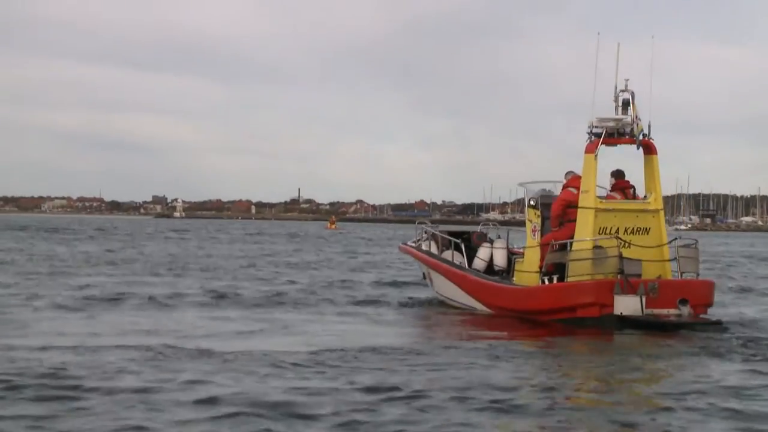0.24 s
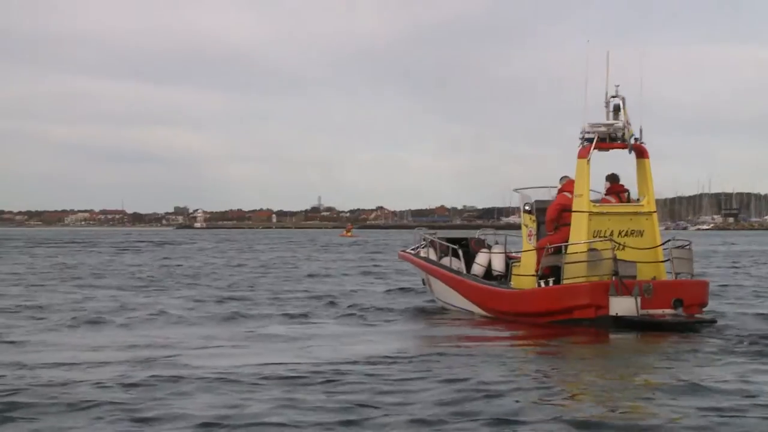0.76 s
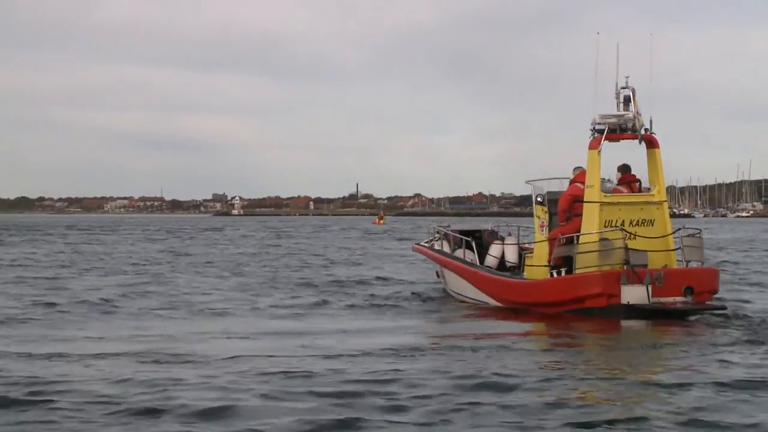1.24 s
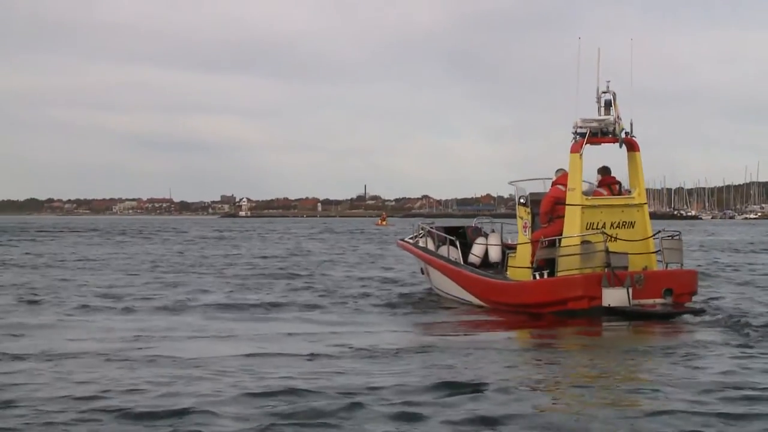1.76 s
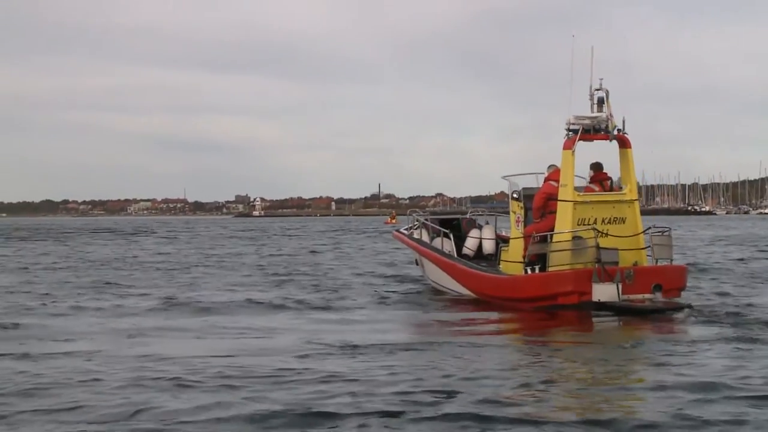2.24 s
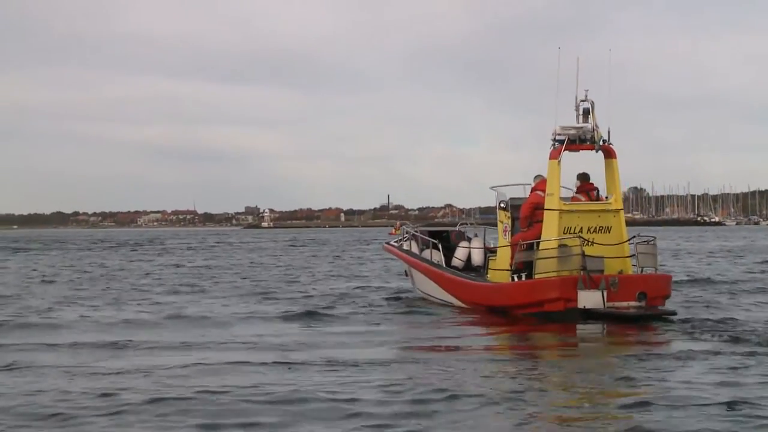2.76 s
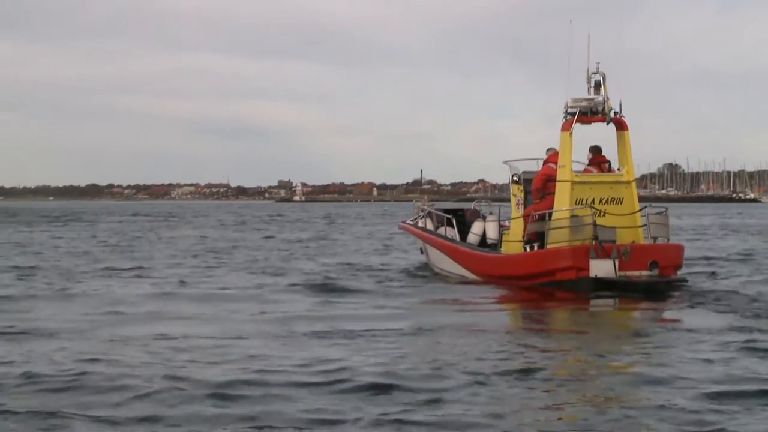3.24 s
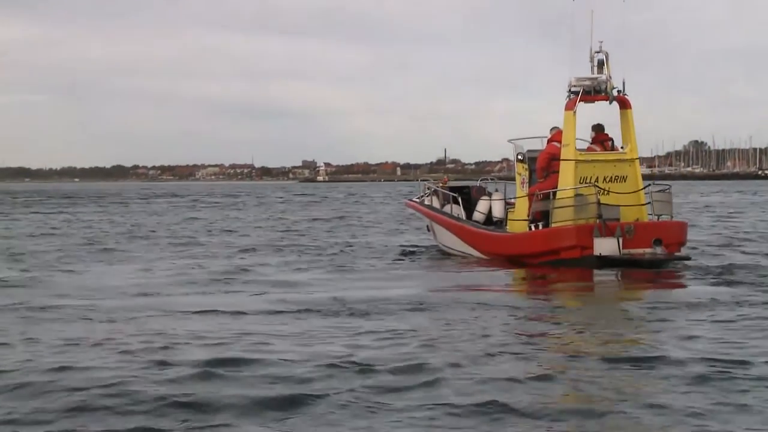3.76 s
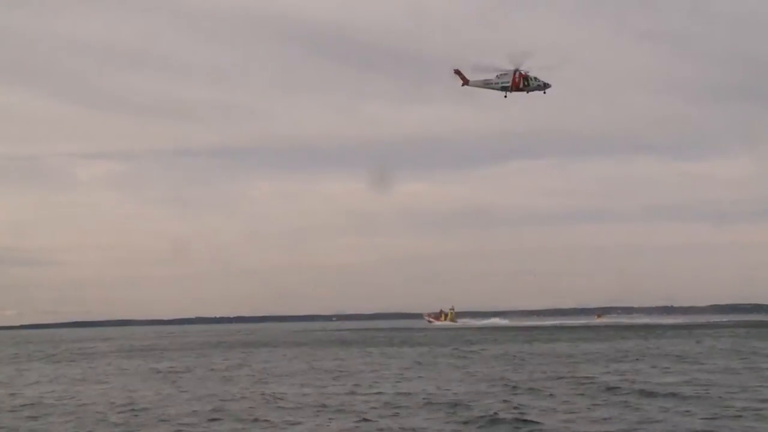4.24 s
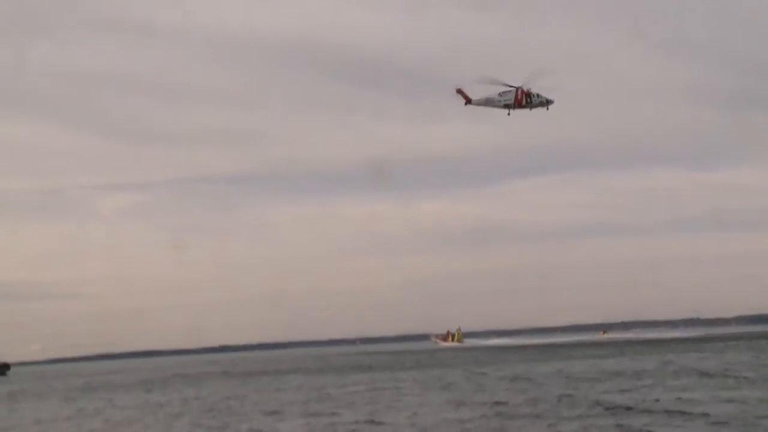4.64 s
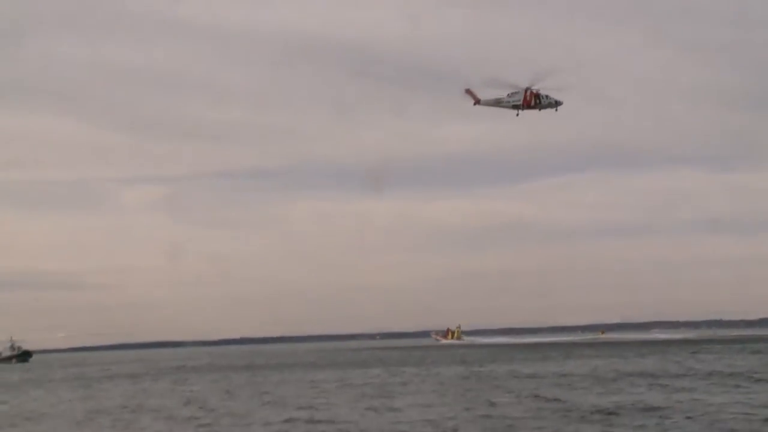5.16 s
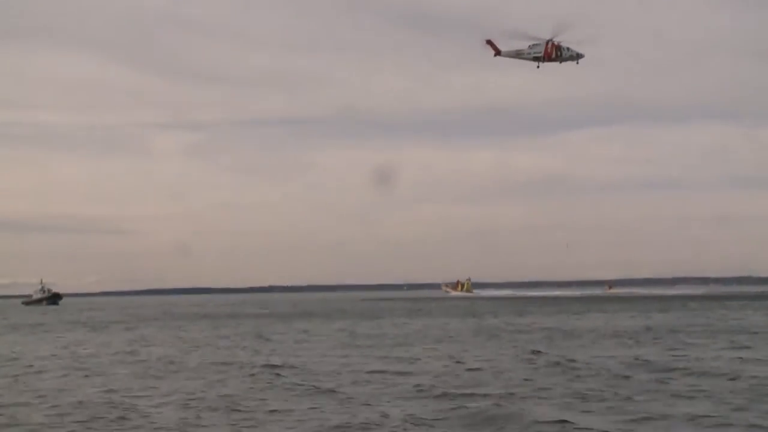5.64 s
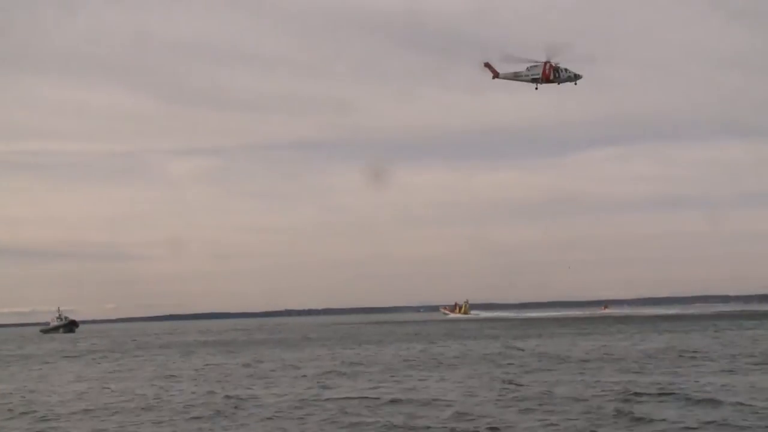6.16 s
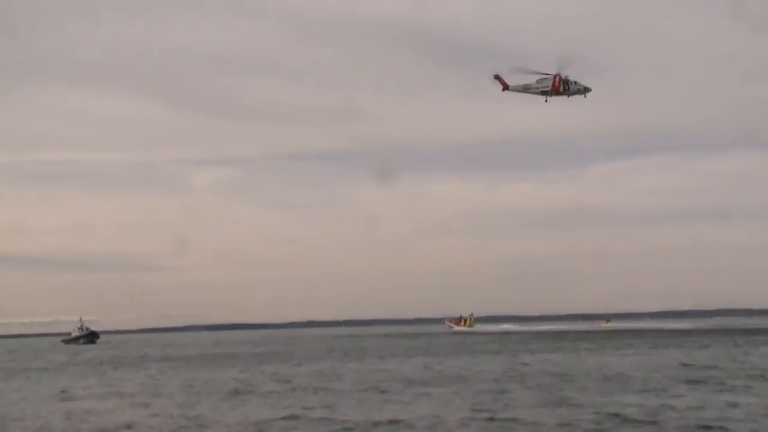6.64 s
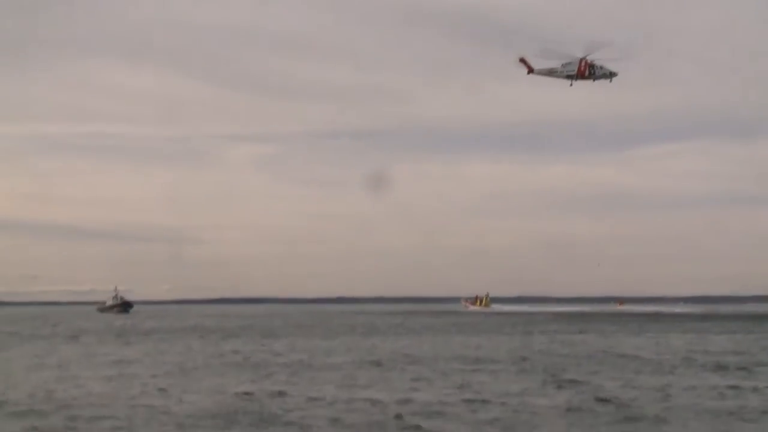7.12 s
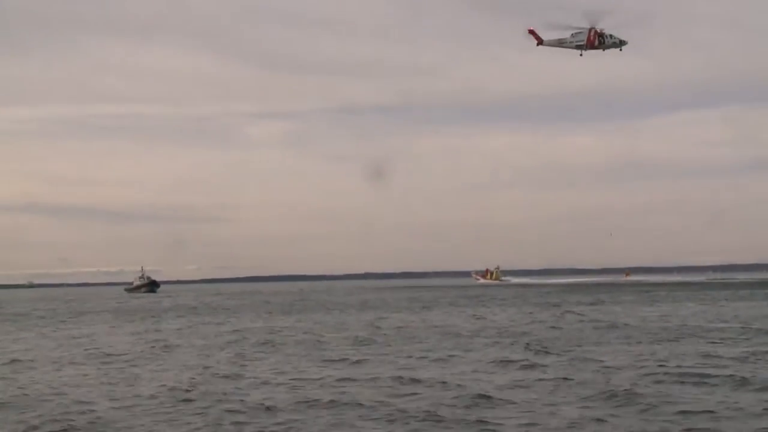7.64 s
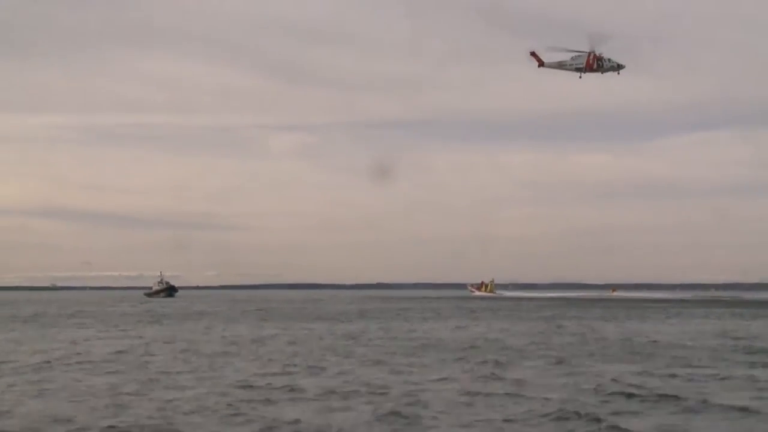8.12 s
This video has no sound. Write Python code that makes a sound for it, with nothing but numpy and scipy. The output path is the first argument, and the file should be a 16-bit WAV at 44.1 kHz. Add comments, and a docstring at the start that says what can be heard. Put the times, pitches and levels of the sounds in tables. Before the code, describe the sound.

Rapid rotor thudding, about twenty-one beats a second, over engine roar and low hum, then a deeper, hissier, windier version of the same helicopter.

```python
"""A helicopter over open water, heard at two places. At the first, each main-rotor blade radiates a thump near
250 Hz and a burst of rough air, over a tail-rotor hum and a roar of turbines and downwash; some blades crack.
From 3.6 s this fades, with a faint passing tone, into a second place with deeper thumps near 120 Hz and rarer cracks.
There washes of hiss, veils of spray, drops and gusts on the microphone pass, and a ripple rides on some thumps."""
import sys
import numpy as np
from scipy import signal
from scipy.fft import rfft, irfft, next_fast_len
from scipy.io import wavfile

SR = 44100
rng = np.random.default_rng(int(sys.argv[2]) if len(sys.argv) > 2 else 0)


def inscribe(sig):
    """Save sig as 16-bit PCM at rate SR to the path in sys.argv[1].

    A 1-D sig is mono; a 2-D sig holds one channel per row.
    Samples are clipped to [-1, 1] before scaling.
    """
    pcm = np.round(np.clip(np.atleast_2d(sig).T, -1, 1) * 32767)
    wavfile.write(sys.argv[1], SR, pcm.astype(np.int16))


N = 369999
TIME = np.arange(N) / SR   # s

# "Spread" is the standard deviation of a bell-shaped envelope.
# Arrival of the blades behind a steady clock. Each row: time in seconds, thump lag in ms, swish lag in ms,
# unrest of the thump's phase in radians.
FIRST_PATH = [(0, 12.2, 16.8, 1.7), (.7, 8.55, 8.4, 1.3), (1.4, 6.95, 8.9, 1.5), (2.1, 9.3, 6.8, 1.5),
              (2.8, 5.6, 7.1, 0.43), (3.5, 9.1, 10.2, 2.3), (4.2, 6.8, 5.6, 1.6)]
SECOND_PATH = [(3.9, 30.8, 26.1, 0.074), (4.6, 34.4, 29, 0.17), (6, 38.05, 34.4, 0.28),
               (6.7, 42.3, 37.3, 0.9), (8.39, 46.73, 40.9, 1.0)]
# Blade sound swelling and sinking, its pitch wandering. Each row: time in seconds, thump pitch in Hz, thump
# level in dB, dull swish level in dB, bright swish level in dB.
FIRST_BLADES = [(0.0, 265, -39, -48, -51.5), (0.15, 269, -34.5, -42.5, -47.5),
                (0.36, 300, -42.5, -50, -51.5), (0.58, 238, -32, -46.5, -52), (0.84, 228, -38, -46, -52),
                (1.2, 256, -38.5, -44, -49.5), (1.42, 216, -34.5, -52, -50.5),
                (1.6, 291, -33.5, -50.5, -49.5), (1.8, 253, -37, -44.5, -48.5),
                (2.24, 251, -41.5, -50.5, -52.5), (2.4, 244, -36.5, -48.5, -45.5),
                (2.74, 241, -36.5, -50, -52.5), (2.88, 260, -49, -49.5, -46.5), (3.0, 271, -36, -48, -48.5),
                (3.13, 262, -49.5, -49.5, -48), (3.421, 265, -36.5, -46.5, -46.5),
                (3.6, 235, -46, -46.5, -52.5), (3.84, 268, -37, -50.5, -53), (4.2, 245, -55, -52, -48)]
SECOND_BLADES = [(4.1, 122, -34.5, -43, -51.5), (4.4, 124, -35.5, -39.5, -44), (4.8, 123, -32, -40, -47.5),
                 (5.22, 117, -34, -42, -52), (5.55, 118, -35, -46.5, -51.5), (5.92, 128, -26, -43.5, -52),
                 (6.2, 120, -32, -42, -47.5), (6.36, 121, -36.5, -50, -54), (6.6, 124, -33.5, -41.5, -52.5),
                 (6.9, 120, -42, -46, -49), (7.181, 114, -31.5, -42.5, -43.5),
                 (7.46, 122, -31.5, -43, -45.5), (7.78, 119, -33.5, -47, -50), (8.12, 111, -29, -39.5, -41),
                 (8.39, 119, -39, -44.5, -46)]
# The crossfade between the places: start in seconds, end in seconds.
FADE_SPAN_S = (3.605, 4.45)
# Slower pressure swings of each blade. Each row: pitch in Hz, spread in ms, peak in dB at median thump level
# and no unrest, lag in ms, share of the thump's swelling and unrest (0-1).
FIRST_SWINGS = [(121, 4.56, -35.5, 0, 0.12), (34, 12.3, -49, 0, 0.02)]
SECOND_SWINGS = [(209, 5.7, -32, -1.55, 0.28), (83.8, 14.7, -38, 1, 1), (21.9, 27, -49.5, -0.29, .1)]
# Relative spectra of the noise in the swishes and the roar. Each row: frequency in Hz, level in dB per Hz.
FIRST_SWISH_SPECTRUM = [(240, -3), (400, 5.5), (478, -12), (793, 2), (1080, 1.5), (1400, -15), (1740, -1.5),
                        (1960, -15), (2250, 3), (3360, -17), (4200, -13), (8440, -41.5), (14000, -76)]
SECOND_SWISH_SPECTRUM = [(180, -36.5), (280, -2.5), (360, 3.5), (480, 15), (640, 7.5), (850, 3),
                         (1180, -10), (1550, -4.5), (1970, -10), (2280, 1.5), (3140, -12), (4400, -15.5),
                         (9070, -54), (14000, -70)]
FIRST_ROAR_SPECTRUM = [(15, -47), (25, -16), (110, -7), (260, -4.5), (360, -13), (470, -18.5), (640, -24.5),
                       (1020, -25), (1340, -28), (1950, -29.5), (2230, -21), (3090, -33), (4260, -32.5),
                       (15500, -81.5)]
SECOND_ROAR_SPECTRUM = [(20, -19.5), (113, -7), (227, -10), (359, -19), (552, -22.5), (1140, -26),
                        (1950, -27), (2200, -20), (2520, -22), (2900, -27.5), (4500, -33), (5100, -41),
                        (6700, -48.5), (9300, -70.5), (15500, -83.5)]
# Engines and downwash. Each row: time in seconds, roar level from 1.5 to 6 kHz in dB.
FIRST_LOAD = [(0, -55), (.4, -58), (1.3, -54.5), (1.9, -57), (3.3, -59.5), (3.8, -61.5), (4.2, -42)]
SECOND_LOAD = [(4.1, -49), (4.36, -43.5), (4.6, -45.5), (6.3, -45.5), (6.48, -41), (6.85, -45), (7.2, -42),
               (8.39, -43.5)]
# Tail rotor. Each row: time in seconds, level of the fundamental in dB.
TAIL_LEVEL = [(0.0, -41.5), (0.6, -46.5), (1.2, -42), (2.1, -46), (3.6, -44), (3.9, -46), (4.8, -40.5),
              (5.1, -39.5), (5.7, -38), (6.3, -32.5), (6.6, -39.5), (7.15, -33), (7.5, -38), (7.8, -33.5),
              (8.1, -44), (8.4, -40)]
# Blade tips cracking through the wake. Each row: time in seconds, shock drive in dB, treble in dB relative to it.
CRACKS = [(0.2054, -17.5, -32), (0.2533, -21, -26), (0.4893, -9, -44), (1.2052, -13, -42),
          (1.6801, -24, -43), (1.729, -2, -36), (1.8258, -15, -42), (1.8731, -14.5, -40),
          (2.1135, -19, -41), (2.3979, -16, -30), (2.4448, -28, -29), (2.7317, -10, -49),
          (2.8775, -19, -36), (2.9253, -19, -40), (3.259, -15, -40), (3.4047, -11, -31), (3.4526, -15, -34),
          (3.4999, -7.5, -23), (3.5473, -5, -23), (4.717, -20, -45), (7.3577, -11, -46), (7.4051, -26, -39),
          (7.5004, -13, -39), (8.1244, -28, -41)]
# Resonances of the microphone. Each row: frequency in Hz, width in Hz, gain in dB.
MIC_RESONANCES = [(2190, 380, 3.5), (1050, 210, -5), (3800, 600, -9.5)]
# Single drops. Each row: start in seconds, initial level in dB.
DROPS = [(2.5238, -60), (2.5765, -60), (4.3174, -67), (4.5344, -63), (7.3048, -69), (7.747, -75),
         (7.761, -57), (8.028, -66)]
# Veils of spray. Each row: centre in seconds, peak in dB before flicker and fade-in, spread in seconds.
SPRAY = [(4.4, -81, .07), (5.05, -84, .03), (5.2, -80, .035), (6.0, -78, .03), (7.55, -73, .06),
         (7.66, -63, 0.045), (7.78, -74, .06)]
# Brighter surges of downwash on the water. Each row: centre in seconds, peak in dB before the crossfade,
# spread in seconds.
WASH = [(4.0, -50, 0.069), (4.45, -48.5, 0.28), (5.7, -62.5, 0.15), (6.55, -48.5, 0.23), (7.1, -49, .2),
        (8.1, -54, 0.5)]
# Treble hiss of the downwash. Each row: time in seconds, level in dB before the crossfade.
SHEEN = [(3.7, -55.5), (4.05, -52), (4.4, -52.5), (5.0, -60), (5.75, -57.5), (6.15, -65), (6.5, -53.5),
         (7.1, -56.5), (7.4, -61.5), (8.39, -60)]
# Spells of ripple on the second place's thumps. Each row: centre in seconds, peak in dB before the crossfade,
# spread in seconds.
RIPPLE = [(6.35, -42, 0.082), (7.38, -39, 0.19), (8.05, -36.5, 0.21)]
# Wind on the microphone. Each row: centre in seconds, peak in dB, spread in seconds.
GUSTS = [(1.3, -48, 0.18), (3.28, -53, .1), (5.2, -55.5, 0.18), (6.4, -41, .25), (6.9, -39.5, .15),
         (7.45, -47, 0.19), (8.2, -39, 0.35)]
# A faint passing tone. Each row: centre in seconds, peak in dB, spread in seconds.
WHISTLE = [(3.64, -64, 0.13)]

BLADE_HZ = 20.9   # blade passages per second
TAIL_HZ, TAIL_WAVER_HZ = 114.75, 0.4
RIPPLE_HZ, WHISTLE_HZ = 295.5, 1400
# levels between surges
BREEZE_DB, MIST_DB, WASH_REST_DB, RIPPLE_REST_DB = -61.5, -97.5, -79, -53.5
AIR_DB = -96.5   # steady faint hiss of the microphone
CUTOFF_HZ = 16300


def from_db(db):
    """Amplitude is ten to the power of the level over twenty."""
    return 10 ** (np.asarray(db) / 20)


def rms_one(x):
    """Division by the root mean square gives unit power."""
    return x / np.sqrt(np.mean(x ** 2) + 1e-20)


def in_time(rows):
    """Linear interpolation turns each column of a timed table into a signal."""
    s, *columns = np.transpose(rows)
    return [np.interp(TIME, s, c) for c in columns]


def at_hz(points, hz):
    """A spectrum is interpolated linearly in dB over logarithmic frequency."""
    point_hz, point_db = np.transpose(points)
    return np.interp(np.log(hz), np.log(point_hz), point_db)


def drift(rate_hz):
    """Slow chance: noise at every 40th sample, twice low-passed, has unit spread and varies smoothly."""
    r = np.exp(-80 * np.pi * rate_hz / SR)
    noise = rng.standard_normal(N // 40 + 2002)
    slow = signal.lfilter([1], [1, -2 * r, r * r], noise)[2000:]   # settled part
    return np.interp(np.arange(N) / 40, np.arange(len(slow)), rms_one(slow))


def band(x, low_hz, high_hz):
    """A band-pass filter transmits the range between two frequencies."""
    return signal.sosfilt(signal.butter(2, [low_hz, high_hz], "band", fs=SR, output="sos"), x)


def noise_bands(spectrum):
    """Shaped noise is the sum of 12 overlapping bands, spaced two thirds of an octave from 60 Hz up."""
    size = next_fast_len(N, True)
    hz = np.maximum(np.arange(size // 2 + 1) * SR / size, 1)
    shaped = rfft(rng.standard_normal(size)) * from_db(at_hz(spectrum, hz))
    place = np.clip(1.5 * np.log2(hz / 60), 0, 11)
    return np.array([irfft(shaped * np.maximum(1 - np.abs(place - k), 0), size)[:N] for k in range(12)])


def surges(rows, rest_db):
    """A gain rests at one level and swells in a bell around each event."""
    gain = from_db(rest_db)
    for s, db, spread_s in rows:
        gain = gain + from_db(db) * np.exp(-.5 * ((TIME - s) / spread_s) ** 2)
    return gain


def wind():
    """Turbulence at the microphone is heard as lumpy low-frequency noise."""
    lumps = band(rng.standard_normal(N), 24, 60) * from_db(1.5 * drift(3.2))
    return surges(GUSTS, BREEZE_DB) * rms_one(lumps)


def water():
    """Fine spray is treble noise under a bell and a drop is its sudden decay, over the microphone's hiss."""
    fade_in = np.clip(TIME - FADE_SPAN_S[0], 0, 1)   # over one second
    gain = surges(SPRAY, MIST_DB) * from_db(1.5 * drift(30)) * fade_in
    gain += from_db(AIR_DB)
    for s, db in DROPS:
        gain += from_db(db) * (TIME > s) * np.exp(-np.maximum(TIME - s, 0) / 0.0019)
    return gain * rms_one(band(rng.standard_normal(N), 7000, 22000))


def whistle():
    """A pure sinusoid of constant pitch swells and fades under a bell."""
    return surges(WHISTLE, -140) * np.sqrt(2) * np.sin(2 * np.pi * WHISTLE_HZ * TIME)


def wash():
    """Downwash striking water gives a flickering band of hiss and a separate sheen of higher noise."""
    hiss = band(band(rng.standard_normal(N), 2400, 3050), 2250, 3060)
    hiss = rms_one(hiss) * from_db(2.6 * drift(13))
    sheen = band(band(rng.standard_normal(N), 3200, 4750), 3200, 4750)
    sheen = rms_one(sheen) * from_db(1.7 * drift(9.9))
    return surges(WASH, WASH_REST_DB) * hiss + from_db(in_time(SHEEN)[0]) * sheen


def roar(spectrum, patchy_db, tint_db):
    """Turbines, downwash and water make noise whose bands flicker partly together and whose colour wanders."""
    together = drift(29)
    out = np.zeros(N)
    for part in noise_bands(spectrum):
        flicker_db = patchy_db * (0.72 * together + drift(6.6))
        out += part * from_db(flicker_db + tint_db * drift(0.57))
    return out / np.std(band(out, 1500, 6000))


def tail_rotor():
    """Periodic blade loading gives a hum of wavering pitch with a weak octave."""
    hz = TAIL_HZ + TAIL_WAVER_HZ * drift(1.5)
    phase = 2 * np.pi * np.cumsum(hz) / SR
    hum = np.sin(phase) + from_db(-18.0) * np.sin(2 * phase)
    return np.sqrt(2) * from_db(in_time(TAIL_LEVEL)[0]) * hum


def cracks():
    """A steep shock and weak followers excite the microphone's resonances; a treble impulse is added to each."""
    body, treble, fall = np.zeros(N), np.zeros(N), np.arange(200)
    for s, db, treble_db in CRACKS:
        at = round(s * SR)
        followers = 0.31 * rng.standard_normal(200) * np.exp(-fall / 70)
        shock = -0.87 * (fall < 2)
        body[at:at + 200] += from_db(db) * (followers + shock)
        treble[at] = -from_db(db + treble_db)
    ringing = np.zeros(N)
    for hz, width_hz, db in MIC_RESONANCES:
        r = np.exp(-np.pi * width_hz / SR)
        poles = [1, -2 * r * np.cos(2 * np.pi * hz / SR), r * r]
        ringing += from_db(db) * signal.lfilter([1 - r, 0, r - 1], poles, body)
    air_loss = signal.butter(4, 6000, fs=SR, output="sos")   # air absorbs the top
    return signal.sosfilt(air_loss, ringing + 1e-18) + band(treble + 1e-18, 4000, 15000)


def blades(lag_ms):
    """Retarded time: a delayed blade clock gives the nearest passage and the time from it in ms."""
    turns = (TIME - lag_ms / 1000) * BLADE_HZ
    count = np.round(turns)
    return count.astype(int) + 1, 1000 * (turns - count) / BLADE_HZ


def ripple():
    """Wake vortices struck by the blades add a few quicker swings to each thump."""
    early_lag = in_time(SECOND_PATH)[0] - 2.5   # ms
    swings = thumps(early_lag, np.full(N, RIPPLE_HZ), 0, 1.66, 1.78, [], uneven_db=4.5)
    return surges(RIPPLE, RIPPLE_REST_DB) * swings


def swishes(lag_ms, spectrum, spread_ms, slide_ms, echo_db, dull_db, bright_db, uneven_db, colour_db, jitter_ms):
    """Each blade sheds a short burst of turbulent noise, with a strength, colour and moment of its own."""
    count, ms = blades(lag_ms)
    chance = rng.standard_normal((200, 14))   # per blade: moment, strength, then 12 band levels
    off = (ms - jitter_ms * chance[count, 0]) / spread_ms
    core = np.exp(-.5 * off ** 2)
    skirts = 0.27 * np.exp(-.5 * (off / 2.88) ** 2)
    bursts = (core + skirts) * noise_bands(spectrum)
    for k, part in enumerate(bursts):
        # blades shed alike amounts of sound before their own strength and colour act
        energy = np.bincount(count, part ** 2, 200) + 1e-20
        even = np.minimum(np.sqrt(np.median(energy[energy > 1e-20]) / energy), 4)
        own = from_db(uneven_db * chance[:, 1] + colour_db * chance[:, 2 + k])
        part = part * (even * own)[count]
        bursts[k] = np.roll(part, round(max(6 - k, 0) * slide_ms * SR / 1000))   # lows come later
    dull = bursts[:7].sum(axis=0)
    bright = bursts[7:].sum(axis=0)
    dull = dull + from_db(echo_db) * np.roll(dull, round(.012 * SR))   # bounce off the water
    return from_db(dull_db) * rms_one(dull) + from_db(bright_db) * rms_one(bright)


def thumps(lag_ms, hz, thump_db, unrest, spread_ms, swings, uneven_db):
    """A suction dip between two pushes; unsteady air shifts the wave in its hull and weakens the slow swings."""
    count, ms = blades(lag_ms)
    centre = np.clip(np.arange(N) - (ms * SR / 1000).astype(int), 0, N - 1)   # sample of the passage
    slip = (unrest * (drift(1.2) + 0.37 * drift(5.5)))[centre]
    pulse = np.exp(-.5 * (ms / spread_ms) ** 2) * np.cos(2 * np.pi * hz[centre] * ms / 1000 + slip)
    strength = from_db(uneven_db * rng.standard_normal(200))   # one per blade
    out = from_db(thump_db) * rms_one(pulse * strength[count])
    for swing_hz, swing_ms, db, late_ms, share in swings:
        since = ms - late_ms
        wave = np.exp(-.5 * (since / swing_ms) ** 2) * np.cos(2 * np.pi * swing_hz * since / 1000)
        change_db = share * (thump_db - np.median(thump_db) - 4.4 * unrest)
        out += from_db(db + change_db) * wave
    return -out


def helicopter(path, heard, load, swings, swish, steady, thump_ms, swish_ms, slide_ms, echo_db, colour_db):
    """Superposition: thumps, swishes and roar of the main rotor and engines add at one listening place."""
    thump_lag, swish_lag, unrest = in_time(path)
    hz, thump_db, dull_db, bright_db = in_time(heard)
    low = thumps(thump_lag, hz, thump_db, unrest, thump_ms, swings, uneven_db=1.18)
    air = swishes(swish_lag, swish, swish_ms, slide_ms, echo_db, dull_db, bright_db,
                  uneven_db=1.66, colour_db=colour_db, jitter_ms=0.74)
    engines = from_db(in_time(load)[0]) * roar(steady, patchy_db=1.47, tint_db=1.74)
    return low + air + engines


def scene():
    """An equal-power crossfade leads from the first place to the second; the other sources add to both."""
    start_s, end_s = FADE_SPAN_S
    angle = np.clip((TIME - start_s) / (end_s - start_s), 0, 1) * np.pi / 2
    first = helicopter(FIRST_PATH, FIRST_BLADES, FIRST_LOAD, FIRST_SWINGS, FIRST_SWISH_SPECTRUM,
                       FIRST_ROAR_SPECTRUM, thump_ms=3.15, swish_ms=2.82, slide_ms=0.11,
                       echo_db=-15.5, colour_db=2.5)
    second = helicopter(SECOND_PATH, SECOND_BLADES, SECOND_LOAD, SECOND_SWINGS, SECOND_SWISH_SPECTRUM,
                        SECOND_ROAR_SPECTRUM, thump_ms=4.43, swish_ms=2.9, slide_ms=1.524,
                        echo_db=-12.5, colour_db=2.06)
    second = second + wash() + ripple()
    mix = first * np.cos(angle) + second * np.sin(angle)
    return (mix + tail_rotor() + cracks() + water() + wind() + whistle())[None]


def record(dry):
    """A steep low-pass filter removes the top, 60 dB down from the cutoff up."""
    return signal.sosfilt(signal.cheby2(12, 60, CUTOFF_HZ, fs=SR, output="sos"), dry)


dry = scene()
out = record(dry)
inscribe(out)
```